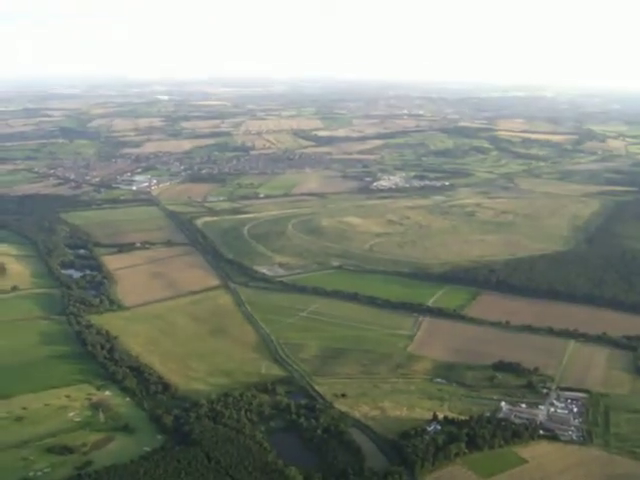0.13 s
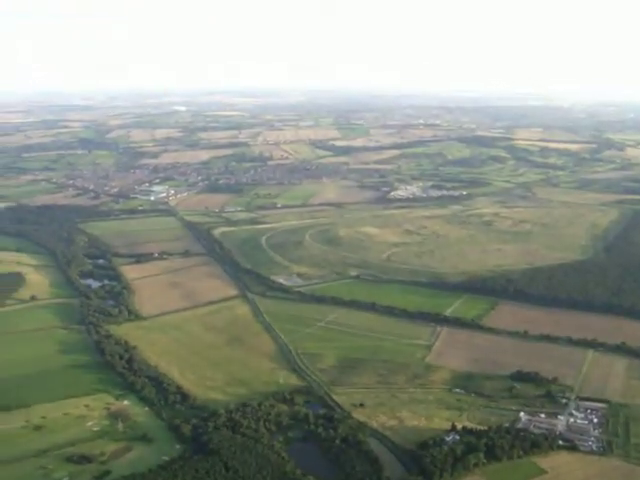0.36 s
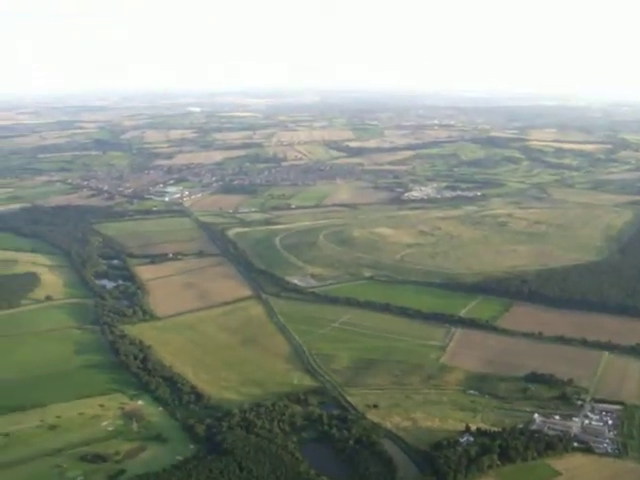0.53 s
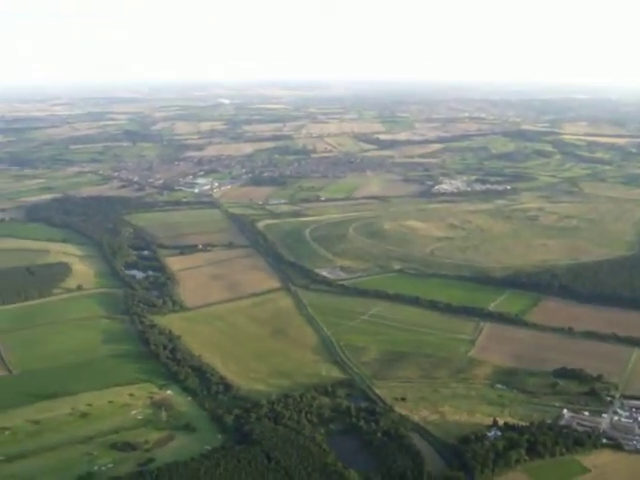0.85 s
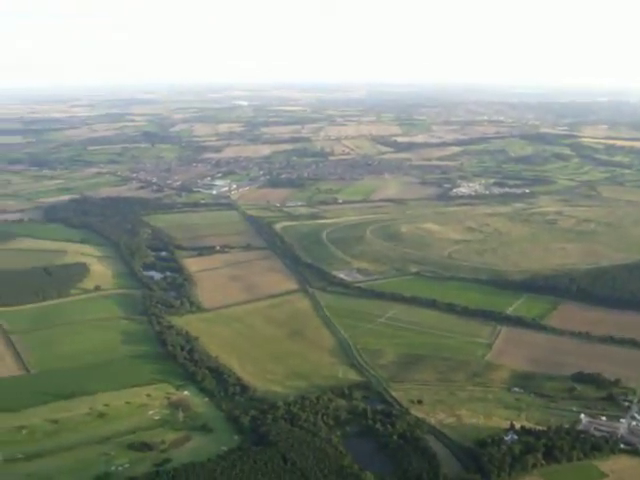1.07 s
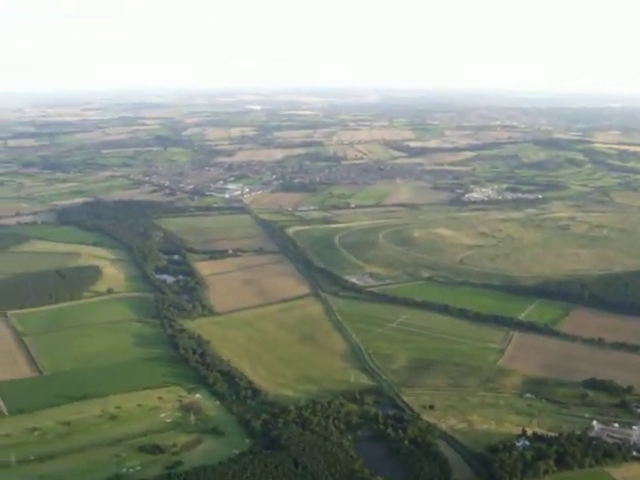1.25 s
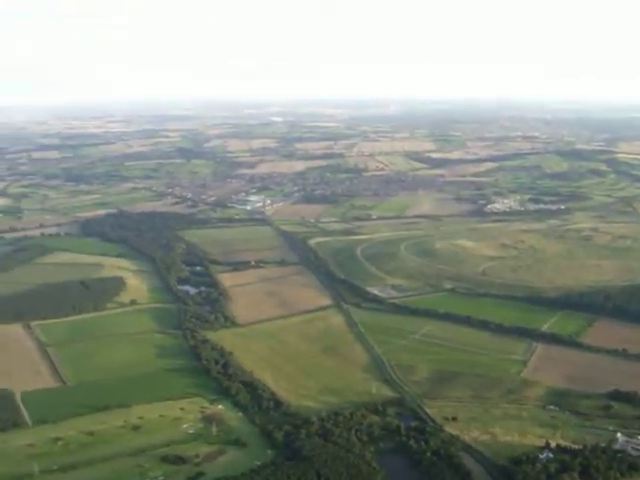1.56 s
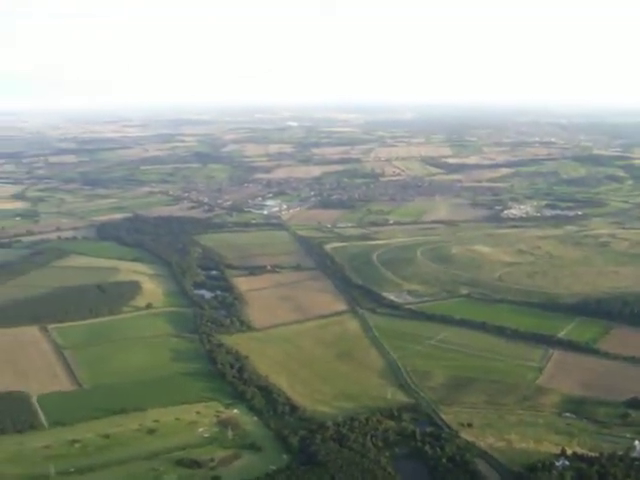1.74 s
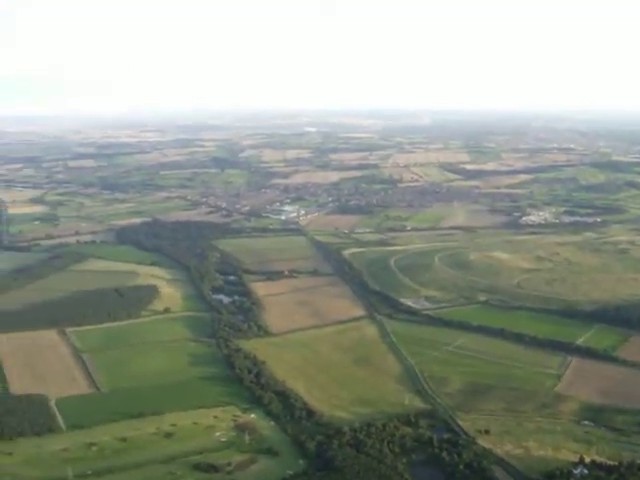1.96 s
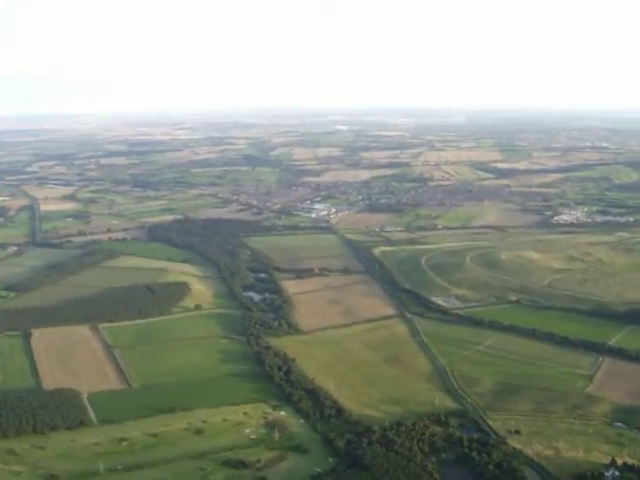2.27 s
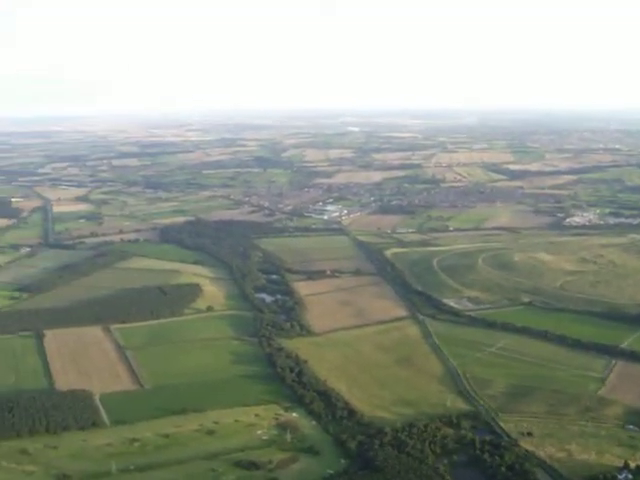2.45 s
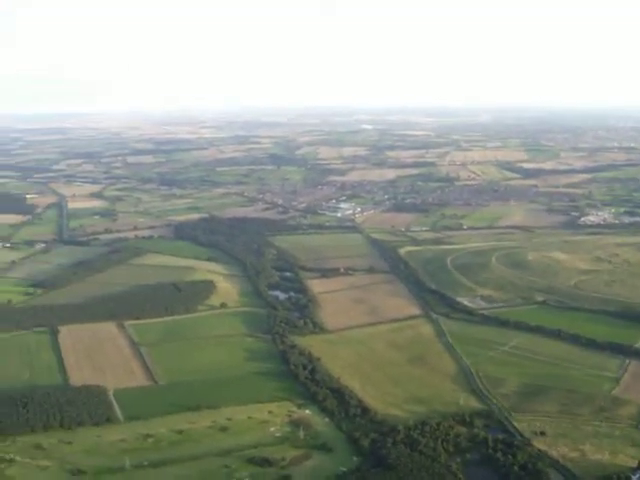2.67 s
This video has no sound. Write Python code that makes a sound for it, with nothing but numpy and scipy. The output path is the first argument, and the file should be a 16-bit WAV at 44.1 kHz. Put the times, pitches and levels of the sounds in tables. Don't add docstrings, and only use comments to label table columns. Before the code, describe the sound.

Continuous balloon burner blast close above the basket, low booming roar with bright pulsing jet hiss

```python
import sys
import numpy as np
from scipy import signal
from scipy.fft import rfft, irfft, next_fast_len
from scipy.io import wavfile
from scipy.ndimage import uniform_filter1d, map_coordinates

SR = 44100
rng = np.random.default_rng(int(sys.argv[2]) if len(sys.argv) > 2 else 0)


def convert_level_to_amplitude(level_db):
    exponent = np.asarray(level_db, float) / 20
    return 10 ** exponent


def wrap_up_sound(samples):
    columns = np.atleast_2d(samples).T
    tamed = np.clip(columns, -1, 1)
    steps = np.round(tamed * 32767).astype(np.int16)
    wavfile.write(sys.argv[1], SR, steps)


N = 123921


def unit(x):
    return x / np.sqrt(np.mean(x ** 2) + 1e-20)


def along(points, hz):
    point_hz, value = np.transpose(points)
    return np.interp(np.log(hz + 1), np.log(point_hz + 1), value)


def wobble(rate_hz):
    knots = rng.standard_normal(int(N * rate_hz / SR) + 4)
    return map_coordinates(knots, [np.arange(N) * rate_hz / SR])


def filtered(x, response):
    size = next_fast_len(N + 8192)
    gain = response(np.fft.rfftfreq(size, 1 / SR))
    return irfft(rfft(x, size) * gain, size)[:N]


def humps(table, hz, steep):
    power = 0
    for centre_hz, width_hz, level_db in table:
        damping = (hz * width_hz) ** 2
        resonance = damping / ((centre_hz ** 2 - hz ** 2) ** 2 + damping)
        power = power + convert_level_to_amplitude(2 * level_db) * resonance ** steep
    return np.sqrt(power)


def patchy(depth_db, shape_db=lambda hz, s: 0):
    hz, s, spectrum = signal.stft(rng.standard_normal(N + 512), SR, nperseg=256)
    patches = uniform_filter1d(rng.standard_normal(spectrum.shape), 4, 0)
    patches = uniform_filter1d(patches, 20, 1)
    gain_db = depth_db * unit(patches) + shape_db(hz[:, None], s)
    return signal.istft(spectrum * convert_level_to_amplitude(gain_db), nperseg=256)[1][:N]


def evened(x, share, span_s):
    swell = np.abs(uniform_filter1d(unit(x) ** 2, max(2, int(span_s * SR)))) + 0.05
    return unit(x / swell ** (np.clip(share, 0, 1) / 2))


# peak_s, level_db, build_up_s, drop_s
SURGE_EVENTS = [(0, 2, .05, 0.024), (.235, 5, 0.037, 0.023), (.257, 1, .015, 0.0054),
                (.59, 2.5, 0.075, 0.06), (.9, 1.5, 0.02, 0.033), (.958, 4.5, .02, 0.02),
                (1.295, 3, 0.046, 0.043), (1.322, 2.5, .015, .01), (1.66, 3.5, 0.09, 0.076),
                (1.95, 1.5, .05, .02), (1.995, 6, 0.028, 0.012), (2.37, 2.5, 0.11, 0.061),
                (2.72, 2.5, 0.056, 0.018), (2.76, 4.5, 0.029, 0.018)]
# pitch_hz, share
SURGE_SHARES = [(2500, 0.39), (4500, 0.88), (7000, 1.26), (11500, 1.35)]
# pitch_hz, depth_db
FLUTTER_DEPTHS = [(2500, 0.83), (6000, 0.45), (11500, 0.85)]


def gas_surges_db(hz, s):
    surge_db = 0
    for peak_s, level_db, build_up_s, drop_s in SURGE_EVENTS:
        fall_s = np.where(s < peak_s, build_up_s, drop_s)
        surge_db = surge_db + level_db * np.exp(-np.abs(s - peak_s) / fall_s)
    growth_db = 0.7 * s
    thin_db = 2 * np.exp(-((hz - 6600) / 1200) ** 2 - (s / 0.16) ** 4)
    flutter = 0.15 * wobble(28.2) + 0.7 * wobble(70) + 0.98 * wobble(130)
    flutter_now = flutter[np.minimum(s * SR, N - 1).astype(int)]
    flutter_db = along(FLUTTER_DEPTHS, hz) * flutter_now
    return along(SURGE_SHARES, hz) * (surge_db + growth_db) - thin_db + flutter_db


# pitch_hz, level_db (per Hz)
JET_HISS = [(1000, -19), (2300, -8.5), (3150, -3.5), (3600, -1.5), (5400, -3.5), (5900, -7.5), (7600, -2.5),
            (10600, -2)]
# pitch_hz, width_hz, level_db (over the hiss)
WHISTLING_EDGES = [(2770, 57, -2), (3534, 25, 3), (3910, 31, 0.5), (4450, 43, 0.5), (4550, 57, -6.5),
                   (4790, 50, 7), (5330, 170, -0.5), (6480, 140, 2), (7410, 100, 2.5), (8080, 180, -1),
                   (9100, 100, -4), (9250, 350, 1), (10460, 350, 0)]


def jet_colour(hz):
    edges = humps(WHISTLING_EDGES, hz, steep=1.8)
    return convert_level_to_amplitude(along(JET_HISS, hz)) * (hz > 600) * np.sqrt(1 + edges ** 2)


def gas_jet():
    turbulence = patchy(depth_db=0.52, shape_db=gas_surges_db)
    return convert_level_to_amplitude(-29) * unit(filtered(turbulence, jet_colour))


# pitch_hz, width_hz, level_db
EDDIES = [(38, 25.5, 2.5), (55.4, 15.8, 0), (102.8, 35, 1.5)]


def flame_rumble():
    fade_db = 1.2 * (np.arange(N) - N / 2) / SR
    rumble = np.zeros(N)
    for centre_hz, width_hz, level_db in EDDIES:
        shape = [(centre_hz, width_hz, 0)]
        eddy = filtered(rng.standard_normal(N), lambda hz: humps(shape, hz, steep=1.457))
        fades = centre_hz > EDDIES[1][0]
        gain = convert_level_to_amplitude(level_db - fade_db * fades) * np.sqrt(width_hz)
        rumble += gain * evened(eddy, share=0.83, span_s=0.11)
    return convert_level_to_amplitude(-17.5) * unit(rumble)


# pitch_hz, width_hz, level_db
ROAR_RESONANCES = [(141, 25, -6.5), (207.2, 59.5, -5.5), (295, 70, -11.5), (392, 49, -19.5),
                   (465, 70, -14.5), (538, 61, -22.5), (739.5, 67, -18), (836, 80, -20.5), (931, 54, -22.5),
                   (1089, 61, -29.5), (1720, 124, -29.5), (1603, 140, -39.5), (1867, 150, -33.5),
                   (2080, 65, -35)]


def flame_roar():
    roar = filtered(patchy(depth_db=0.25), lambda hz: humps(ROAR_RESONANCES, hz, steep=1.337))
    return convert_level_to_amplitude(-22) * evened(roar, share=1, span_s=0.43)


# pitch_hz, width_hz, depth_db
RIM_HOLLOWS = [(603, 20, 3), (1378, 102, 5.5), (2330, 52, 3.5), (3205, 94, 6), (4820, 54, 7),
               (6840, 120, 0), (7540, 87, -3.5)]


def basket_rim(hz):
    depth_db = 0
    for centre_hz, width_hz, hollow_db in RIM_HOLLOWS:
        depth_db = depth_db + hollow_db * np.exp(-((hz - centre_hz) / width_hz) ** 2)
    return convert_level_to_amplitude(-depth_db)


def scene():
    burner = gas_jet() + flame_rumble() + flame_roar()
    return filtered(burner, basket_rim)[None]


def microphone(hz):
    bass_cut = hz ** 2 / np.sqrt(hz ** 4 + 14 ** 4)
    khz_over = np.maximum(hz - 10860, 0) / 1000
    return bass_cut * convert_level_to_amplitude(-18 * khz_over ** 1.6)


def top_cut(x):
    return signal.sosfilt(signal.butter(12, 12270, fs=SR, output="sos"), x)


def record(dry):
    mix = filtered(dry[0], microphone)[None] + 0.0087
    return top_cut(mix)


dry = scene()
out = record(dry)
wrap_up_sound(out)
```